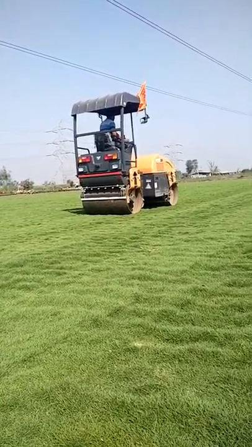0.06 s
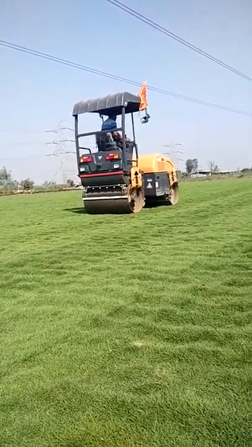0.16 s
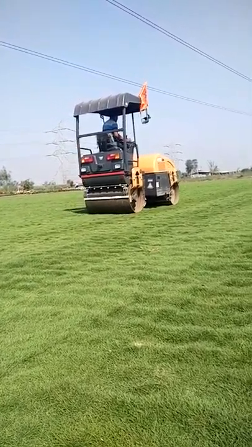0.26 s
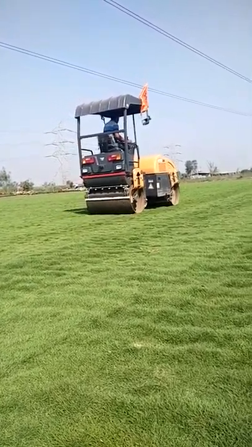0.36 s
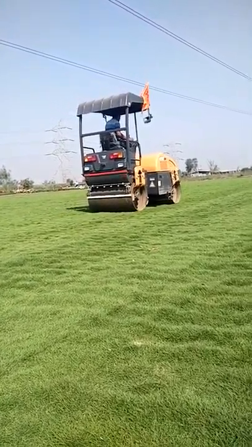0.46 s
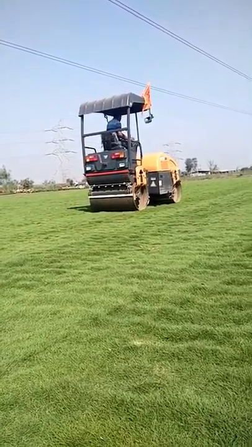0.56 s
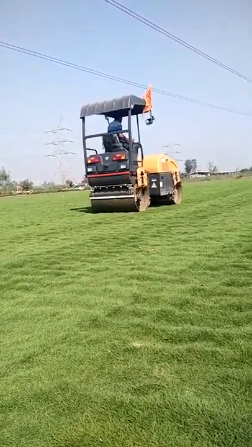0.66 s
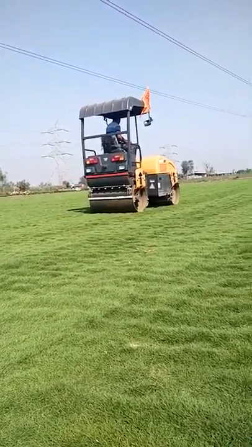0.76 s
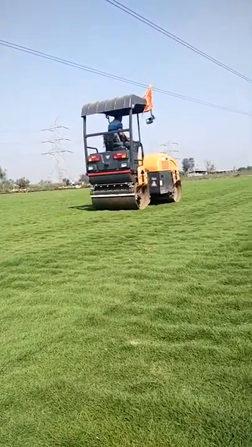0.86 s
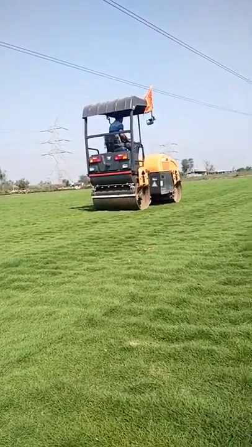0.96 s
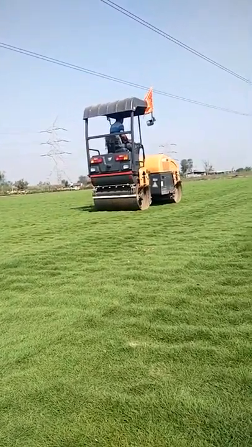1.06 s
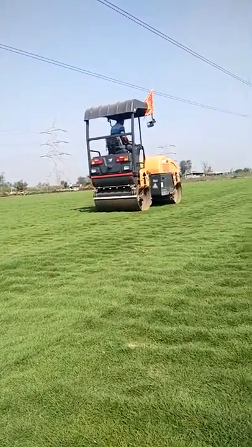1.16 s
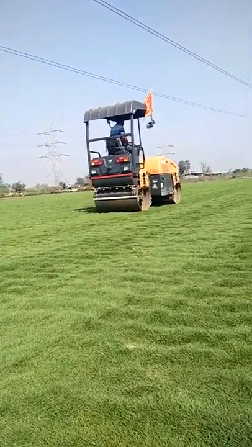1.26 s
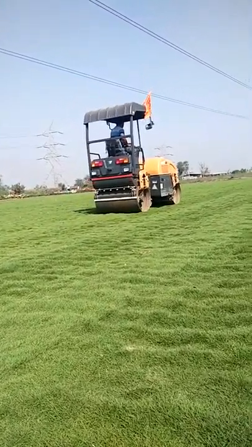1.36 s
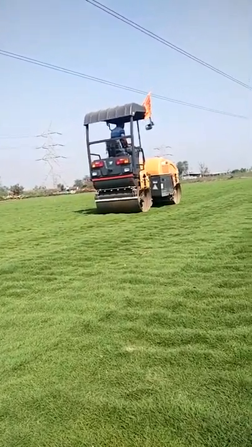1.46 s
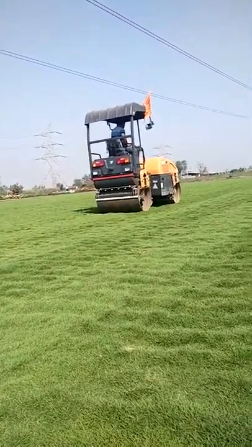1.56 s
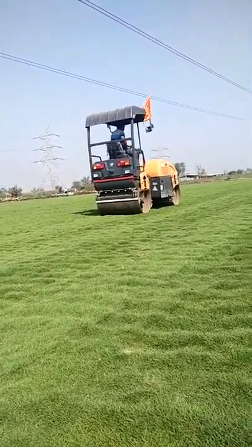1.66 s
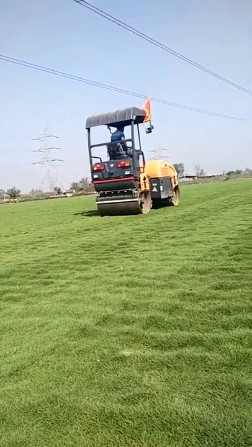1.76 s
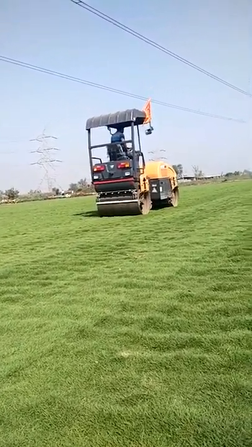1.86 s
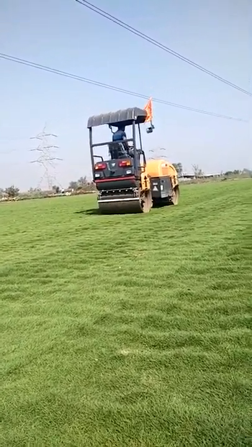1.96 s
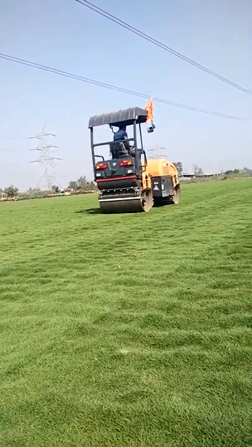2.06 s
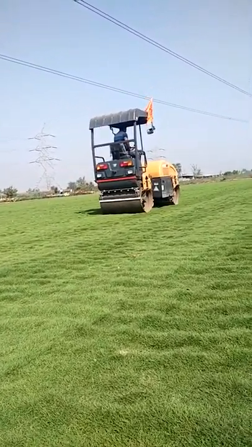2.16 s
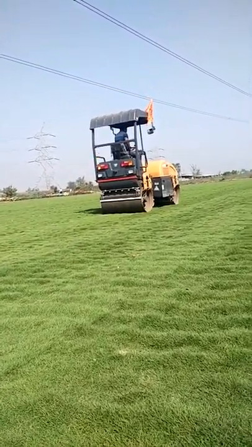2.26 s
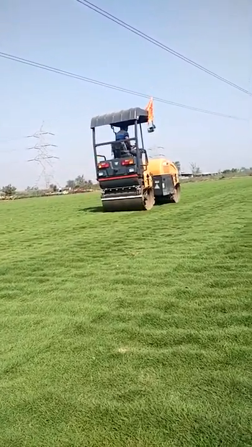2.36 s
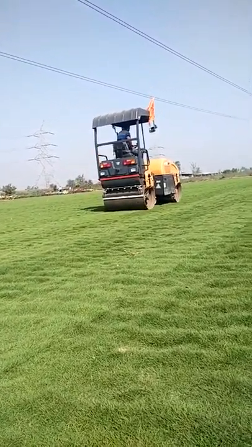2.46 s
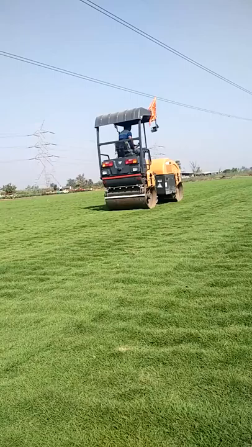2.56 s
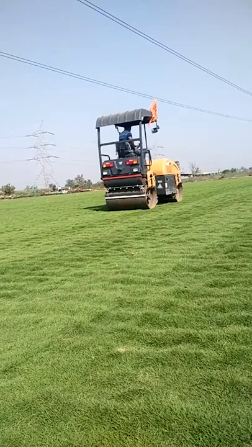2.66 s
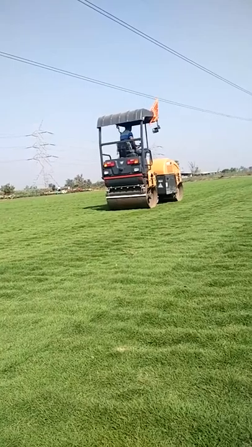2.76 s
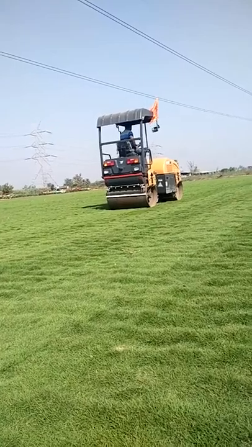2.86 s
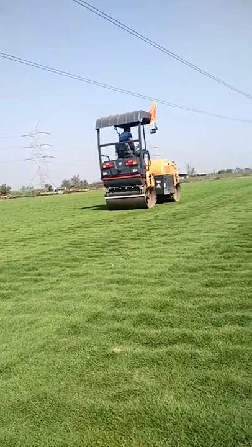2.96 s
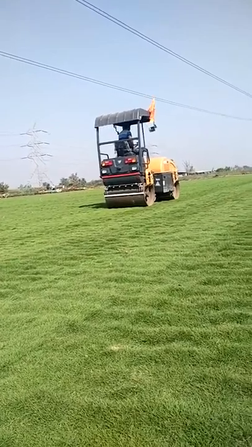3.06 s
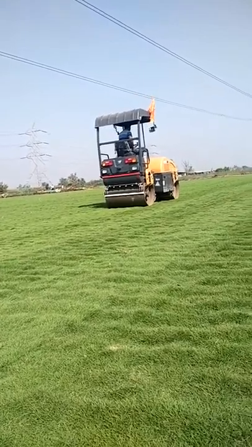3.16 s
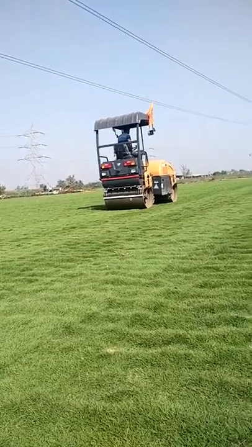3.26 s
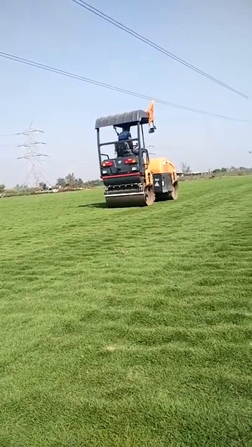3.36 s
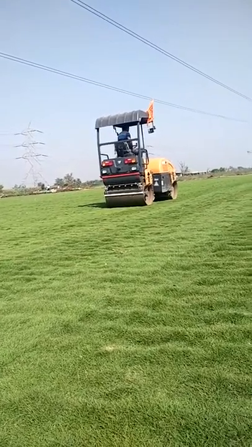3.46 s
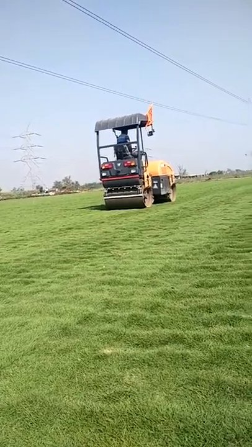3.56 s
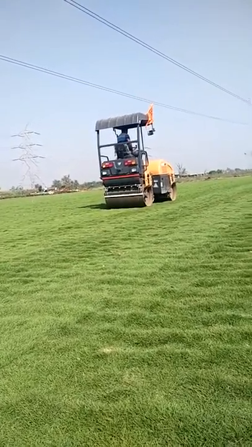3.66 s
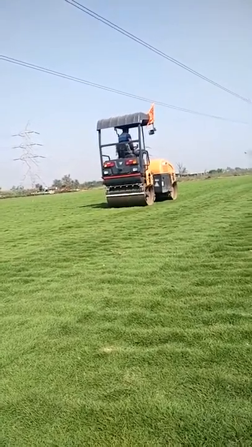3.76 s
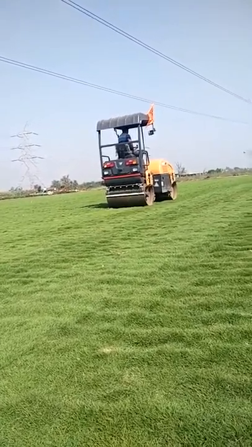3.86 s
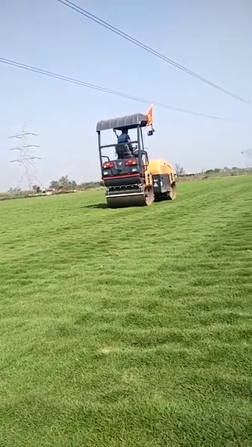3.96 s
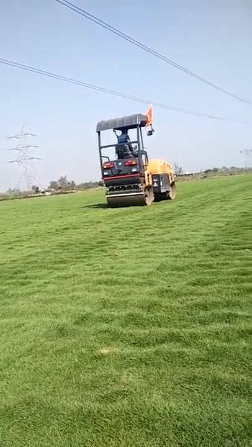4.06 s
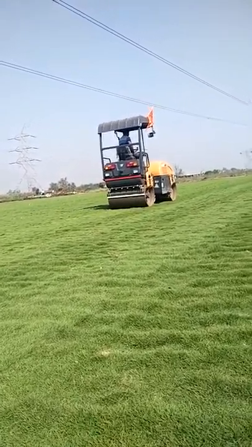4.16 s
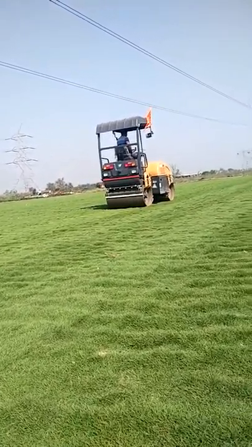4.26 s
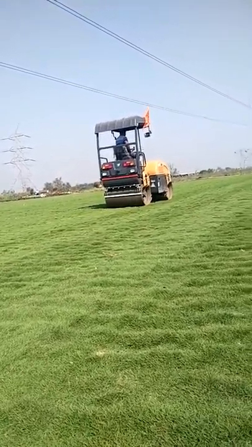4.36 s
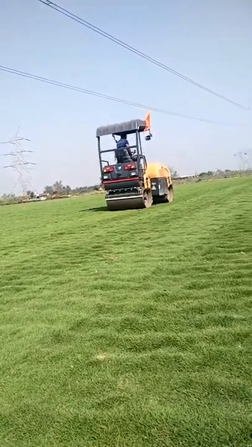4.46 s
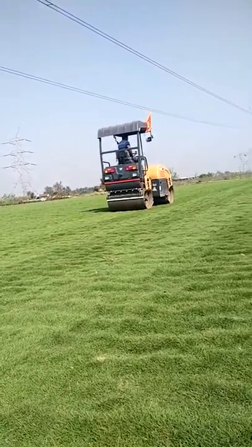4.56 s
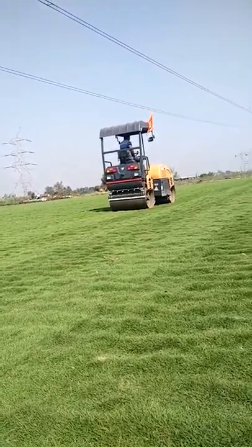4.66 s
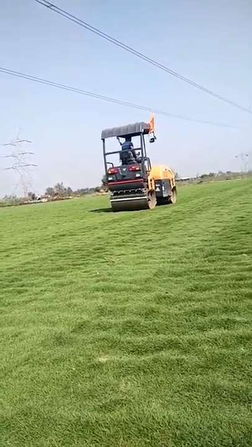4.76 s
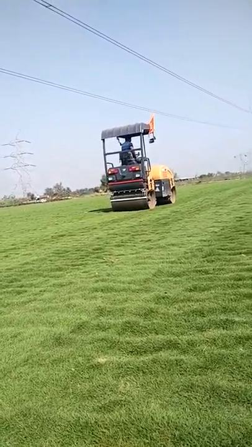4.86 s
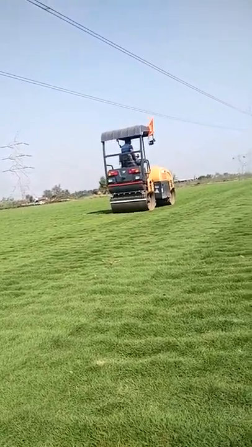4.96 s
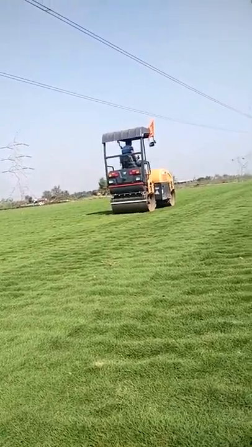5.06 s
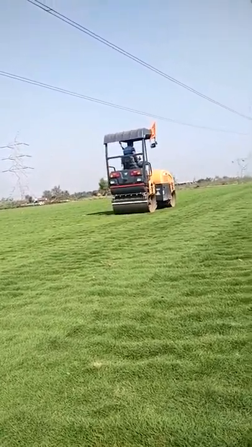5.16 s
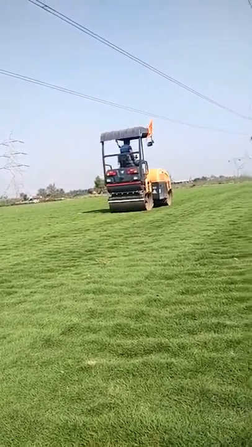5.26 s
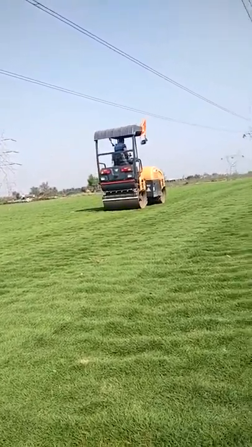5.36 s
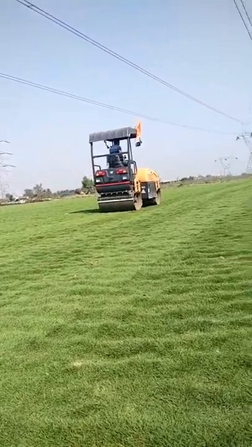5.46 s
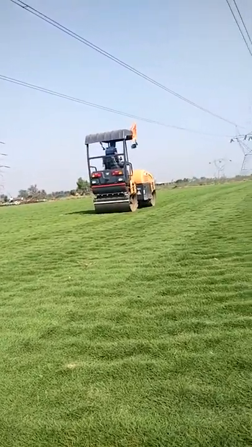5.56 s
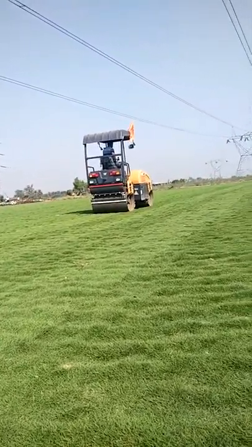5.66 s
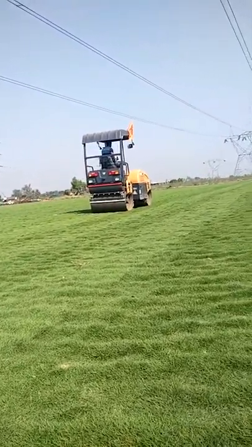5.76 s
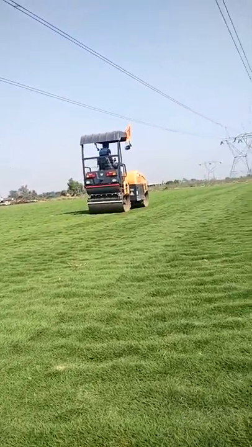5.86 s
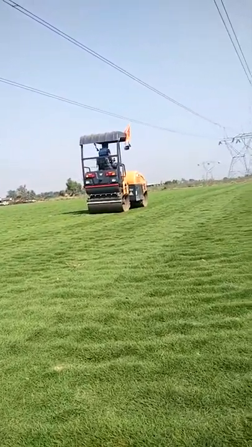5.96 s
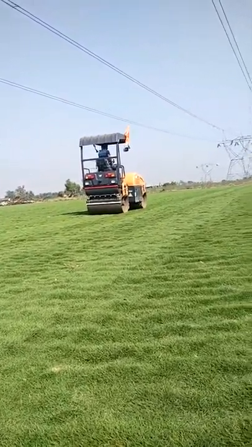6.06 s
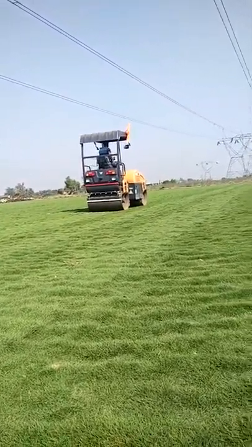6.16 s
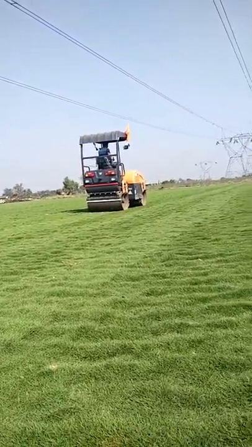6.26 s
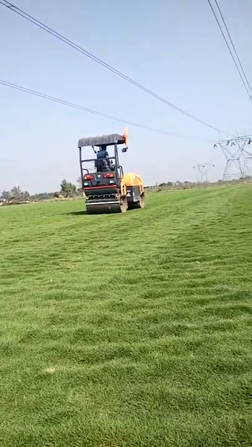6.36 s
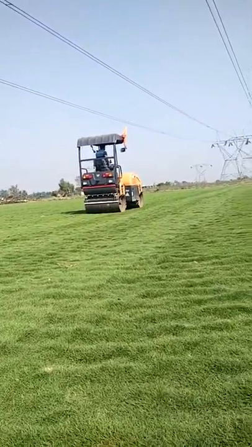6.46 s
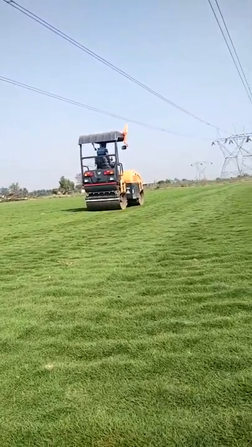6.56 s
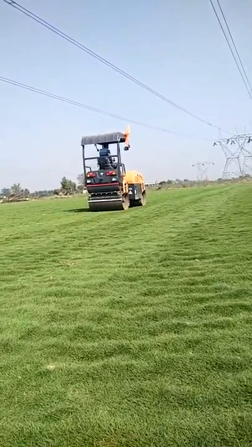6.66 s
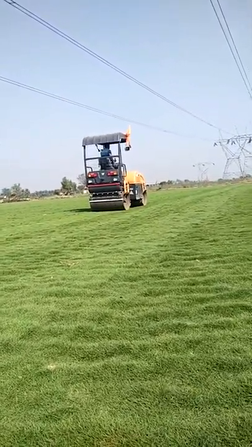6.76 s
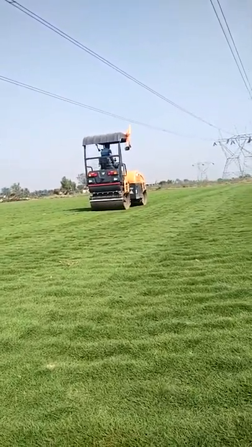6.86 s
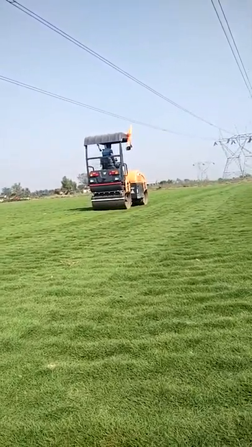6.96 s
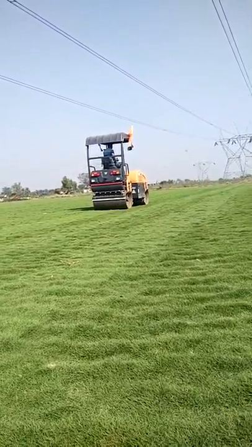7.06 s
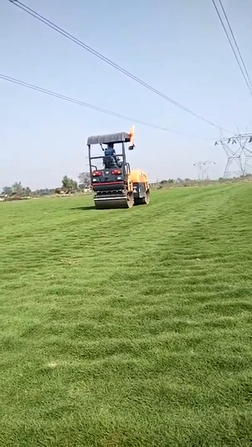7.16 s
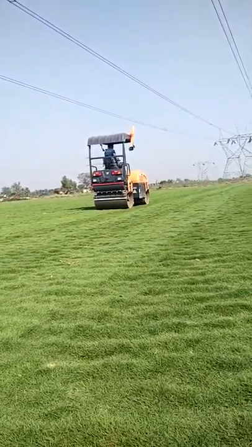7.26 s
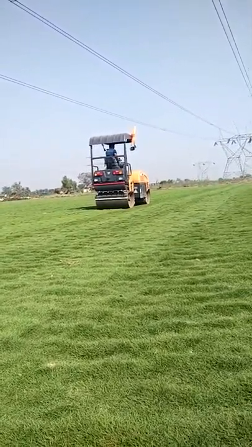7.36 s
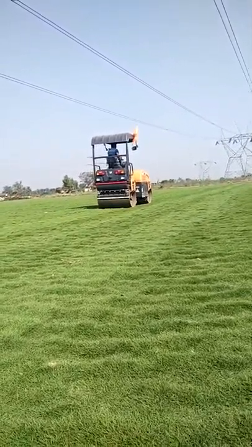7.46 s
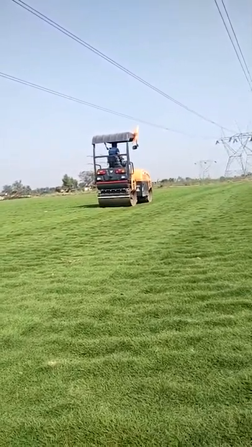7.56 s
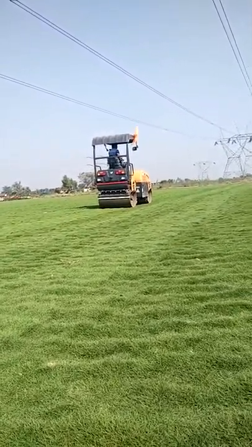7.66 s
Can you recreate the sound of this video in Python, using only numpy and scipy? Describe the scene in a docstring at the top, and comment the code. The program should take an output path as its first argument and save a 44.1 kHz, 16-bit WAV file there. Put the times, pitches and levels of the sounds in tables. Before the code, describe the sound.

A small ride-on roller runs on an open lawn with no echo. Its engine drones steadily and surges slightly about once a second, while a loose metal panel chatters and clacks sharply and a deep throb swells and sinks. After about two seconds the rattling eases, and the machine grows fainter and duller as it drives away from the microphone.

```python
"""On an open lawn, with no echo, a small ride-on roller drives away, growing fainter and duller.
Its engine drifts around 79 firings a second and works harder after each dip in speed.
Each firing puffs through the exhaust and shakes a loose metal panel, which chatters most when the
engine works hard and clacks on bumps. A deep throb, probably the vibrating drum, swells and sinks."""
import sys
import numpy as np
from scipy import signal
from scipy.fft import rfft, irfft, next_fast_len
from scipy.io import wavfile
from scipy.ndimage import uniform_filter1d, map_coordinates

SR = 44100
rng = np.random.default_rng(int(sys.argv[2]) if len(sys.argv) > 2 else 0)


def int16_out(signal):
    """Quantize to a 16-bit WAV file."""
    q = np.round(np.clip(np.atleast_2d(signal).T, -1, 1) * 32767)
    wavfile.write(sys.argv[1], SR, q.astype(np.int16))


N = 339570

# the engine's slowest and fastest moments as its speed control hunts: t/s, firing rate/Hz
ENGINE_SPEED = [(-0.1, 78.79), (0.39, 77.18), (0.91, 79.24), (1.59, 77.95), (2.16, 79.82), (2.88, 78.02),
                (3.49, 79.85), (4.12, 77.68), (4.77, 79.9), (5.3, 77.45), (6.07, 79.76), (6.66, 77.92),
                (7.37, 79.26), (7.78, 77.9)]
# the repeating strengths of four firings in a row: level/dB
FIRING_PATTERN = [-0.1, 0.39, -0.35, -0.29]
# the loose panel's low ring, then its upper tones: f/Hz, width/Hz, level/dB, delay/firings
PANEL_TONES = [(2879, 35.4, -2, 0.97), (3440, 44, -1, 0.936), (3553, 72, 0, 0.711), (4218, 98, -3.5, 0.013),
               (4362, 102, -2.5, 0.0045), (4300, 240, -37, 0.033)]
# hard knocks of the panel: t/s, peak level/dB, f/Hz of the tone struck hardest
PANEL_KNOCKS = [(0.166, -18, 3417), (0.269, -18.5, 3490), (0.3202, -23, 3520), (0.4489, -32, 4350),
                (0.5786, -20.5, 3660), (0.705, -20, 3620), (0.9337, -20.5, 2763), (1.084, -28, 3420),
                (1.2365, -19.5, 3440), (1.3392, -16, 2770), (1.4037, -21, 3420), (1.6074, -16.5, 2830),
                (1.632, -17, 2930), (1.6851, -19, 4350), (1.915, -23, 3520), (1.9652, -23.5, 2890),
                (2.0654, -31, 3380), (2.6184, -32.5, 2860), (2.7217, -30, 4500), (2.902, -29, 2870),
                (3.0797, -23.5, 3600), (3.2695, -30, 2860), (3.4467, -35.5, 2800), (3.5959, -35, 3450),
                (4.0796, -28, 3580), (5.3645, -36.5, 3490), (5.4296, -35, 4220), (5.597, -34, 4260),
                (5.699, -36, 2870), (6.5686, -40, 3460), (6.8508, -35.5, 2830)]


def amp(db):
    """Turn decibels into a gain."""
    return 10 ** (np.asarray(db) / 20)


def unit(x):
    """Scale a sound to an average (rms) size of 1."""
    return x / np.sqrt(np.mean(x ** 2) + 1e-20)


def curve(rows):
    """Join (time, value) points with straight lines, one value per sample."""
    return np.interp(np.arange(N) / SR, *np.transpose(rows))


def wobble(rate):
    """A smooth curve through `rate` random points a second."""
    return map_coordinates(rng.standard_normal(int(N * rate / SR) + 4), [np.arange(N) * rate / SR])


def softened(gain):
    """Smooth the steps in a gain so that they do not click."""
    return uniform_filter1d(gain, size=64, axis=-1)


def filtered(x, response):
    """Multiply each frequency in x by response(frequency)."""
    size = next_fast_len(N + SR // 2)
    return irfft(rfft(x, size) * response(np.fft.rfftfreq(size, 1 / SR)), size)[:N]


def shaped(x, f, db):
    """Give x a tone colour (a level for each frequency), at size 1."""
    return unit(filtered(x, lambda hz: amp(np.interp(np.log(hz + 1), np.log(f), db))))


def coloured(x, colour):
    """Blend from the near to the far tone colour as the roller leaves and turns its back."""
    # t/s, share of the far colour/0-1
    far_share = [(1.8, 0), (2.8, 0.15), (4.5, 0.61), (5.4, 0.74), (7.7, 0.99)]
    share = np.clip(curve(far_share), 0, 1)
    f, near_db, far_db = np.transpose(colour)
    return unit((1 - share) * shaped(x, f, near_db) + share * shaped(x, f, far_db))


def receding(near_db, loss):
    """One part's level in dB as the roller leaves; a bigger loss makes it fade faster."""
    # the fade with distance: t/s, level/dB
    fade = [(0.0, -1.5), (0.6, -0.93), (1.1, -2.5), (2.17, -4), (2.45, -10.5), (3.4, -9), (4.45, -10.6),
            (4.9, -13), (5.9, -12), (6.3, -14), (7.1, -13.5), (7.7, -16)]
    return near_db + loss * curve(fade)


def engine_speed(delay_s=0):
    """Firings per second, swinging smoothly between slow and fast."""
    times, rates = np.transpose(ENGINE_SPEED)
    points = np.arange(len(times))
    whole, part = np.divmod(np.interp(np.arange(N) / SR - delay_s, times, points), 1)
    return np.interp(whole + (1 - np.cos(np.pi * part)) / 2, points, rates)


def surges(half_width_s, lead_s=0):
    """The engine works harder after each dip in speed: four curves of smooth rises in dB."""
    # t/s, then the rise of: thump/dB, low panel tone/dB, upper panel tones/dB, ticking/dB
    efforts = [(0.5, 15.5, -3, 6, 12.5), (1.64, 10, 6, 13.5, 12), (2.94, 6, 9, 13, 15),
               (4.3, 8.5, 9, 12.5, 12.5), (5.53, 9.5, 6, 15.5, 17.5), (6.79, 7, 4, 7.5, 5.5)]
    t = np.arange(N) / SR + lead_s
    return sum(np.outer(rises, np.exp(-((t - s) / half_width_s) ** 2)) for s, *rises in efforts)


def exhaust(firings, thump_db, drone_db, strain=1.79):
    """The muffler lets the low tones through; uneven firings add weak tones between them."""
    # the drone: f/firing rate, level/dB against drone_db
    drone_tones = [(1.25, -15), (1.75, -20.5), (2, 0.5), (2.25, -36), (3, -17), (4, -20)]
    # the growl of hard work: f/firing rate, level/dB against the strongest thump
    growl_tones = [(5, -19.5), (9, -22)]

    def tones(table):
        return sum(amp(db + .7 * wobble(16)) * np.sin(2 * np.pi * (multiple * firings + rng.random()))
                   for multiple, db in table)

    thump = amp(thump_db) * np.sin(2 * np.pi * firings)
    # the growl grows faster than the thump, so it stands out only during hard work
    growl_db = thump_db.max() + strain * (thump_db - thump_db.max())
    growl = amp(growl_db) * tones(growl_tones)
    drone = amp(drone_db) * tones(drone_tones)
    return np.sqrt(2) * (thump + growl + drone)


def turbulence(x, depth_db):
    """Swirling air: nearby frequencies swell and sink together for a moment."""
    spectrum = signal.stft(x, nperseg=1024)[2]
    patches = uniform_filter1d(rng.standard_normal(spectrum.shape), size=3, axis=0)
    patches = uniform_filter1d(patches, size=5, axis=1)
    return signal.istft(spectrum * amp(depth_db * unit(patches)), nperseg=1024)[1][:N]


def roar(firings, roar_db):
    """The fan and engine block roar: mostly swirling air, plus a part that repeats each engine cycle."""
    # f/Hz, near level/dB, far level/dB
    roar_colour = [(25, -1, -18), (107, 3, 6.5), (220, -1.5, -2), (302, 1, -1), (410, 2.5, -5),
                   (543, -6, -10), (775, -6, -11), (921, -23, -23), (1230, -17.5, -19.5),
                   (1520, -19, -21.5), (1616, -11.5, -25.5), (1734, -30.5, -24), (2135, -11, -15.5),
                   (3390, -10, -18), (7500, -42, -56)]
    cycle = rng.standard_normal(2048)
    repeating = .35 * cycle[(firings / len(FIRING_PATTERN) % 1 * len(cycle)).astype(int)]
    pulsing = 1 + 0.055 * np.cos(2 * np.pi * (firings - .1))
    air = pulsing * (rng.standard_normal(N) + repeating)
    return amp(roar_db) * coloured(turbulence(air, depth_db=3.0), roar_colour)


def bursts(firings, lag, rise, fall, scatter_db, grit_db):
    """One gritty burst of tiny taps per firing; lag, rise and fall are counted in firings."""
    index, age = np.divmod(firings - lag % 1 + 1, 1)
    count = int(index.max()) + 1
    sizes = amp(np.resize(FIRING_PATTERN, count) + scatter_db * rng.standard_normal(count))
    shape = (1 - np.exp(-age / rise)) ** 2 * np.exp(-age / fall)
    grit = amp(grit_db * wobble(1200)) * rng.standard_normal(N)
    return unit(sizes[index.astype(int)] * shape * grit)


def rattle(firings, low_db, upper_db):
    """Each firing throws the panel with a new strength, so that it chatters, rings and scrapes."""
    # f/Hz, near level/dB, far level/dB
    scrape_colour = [(2460, -43, -20), (2777, 23, 43), (3360, -5, -5), (3530, 9.5, -16), (4630, 17.5, -22),
                     (4670, -29, -40), (7200, -34, -48)]
    low_gain, upper_gain = np.hypot(amp([low_db + 0.52 * wobble(9), upper_db]), flurries())
    index = (firings + .15).astype(int)
    throw = amp(1.5 * rng.standard_normal(index.max() + 1))[index]
    tones = []
    for hz, width, db, lag in PANEL_TONES:
        chatter = throw * bursts(firings, lag, rise=.12, fall=.066, scatter_db=1, grit_db=5)
        tones.append(amp(db) * unit(ring(chatter, hz, width)))
    upper = unit(sum(amp(2.1 * wobble(9)) * tone for tone in tones[1:]))  # these trade strength
    rubbing = throw * bursts(firings, lag=.93, rise=.14, fall=.13, scatter_db=1, grit_db=3)
    scrape = amp(-4) * coloured(rubbing, scrape_colour)
    return lift() * (low_gain * tones[0] + upper_gain * (upper + scrape))


def ring(x, hz, width):
    """Let x ring one tone of the panel, with little sound far below or above it."""
    band = lambda f: 1 / (1 + (np.abs(f - hz) / 1100) ** 6)
    return filtered(x, lambda f: band(f) * 1j * f * width / (hz * hz - f * f + 1j * f * width))


def rasp(firings, rasp_db):
    """A longer, rough burst of noise comes with each firing."""
    # f/Hz, near level/dB, far level/dB
    rasp_colour = [(1900, -56, -10), (1955, 2, 4), (2560, 8, 2), (3250, 2, 6.5), (3630, 4, 9),
                   (4500, -51, -21), (4810, 4.5, -55), (5760, -4, -2), (7240, -41.5, -36)]
    noise = bursts(firings, lag=.8, rise=.12, fall=.6, scatter_db=1.5, grit_db=2)
    return amp(rasp_db) * coloured(noise, rasp_colour)


def ticking(firings, effort_db):
    """A sharp tick and a thin spit lead each firing, louder during hard work, over a soft high hiss."""
    # three tone colours: f/Hz, near level/dB, far level/dB
    tick_colour = [(2000, -13, -32), (5070, 3, -51), (5410, -3, 13.5), (5620, 9, -1), (5940, -29, -14),
                   (5850, 2, -4), (5880, -7, 6.5), (6530, 7, 4.5), (7035, -10, -12), (6950, -11, -24),
                   (8000, -40, -43), (12000, -50, -50)]
    spit_colour = [(6400, -20, -14), (7550, 2.5, -20), (7950, -40, -11), (8380, -0.5, 3.5), (9200, 3, 2),
                   (10300, -1, -10.5), (12000, -24, 0.5), (15300, -15, -28)]
    hiss_colour = [(7050, -12, -8), (10100, -11, -2), (11040, 0, -1), (12400, -13, -1), (13100, 2, 0),
                   (14100, 1, -17), (15300, -16, -7)]
    # loudness of the spit in easy running, and of the hiss: t/s, level/dB
    spit_levels = [(0.0, -73), (1.6, -69.5), (2.7, -75.5), (3.5, -70), (4.7, -75.5), (6.0, -66.5),
                   (6.6, -70.5), (7.3, -80.5), (7.7, -73)]
    hiss_levels = [(0.0, -64), (0.3, -58.5), (0.65, -68), (0.85, -60), (1.3, -70), (2.28, -72),
                   (2.52, -59.5), (2.75, -71.5), (3.62, -63), (3.8, -68), (4.0, -62), (4.25, -63.5),
                   (4.55, -69.5), (4.97, -65), (5.55, -73), (6.25, -65), (7.0, -68.5), (7.7, -72)]
    tick_db = receding(-48, loss=1.86) + effort_db
    spit_db = curve(spit_levels) + 0.51 * effort_db
    puffs = lambda: bursts(firings, lag=.78, rise=.08, fall=.19, scatter_db=1.6, grit_db=1)
    taps = bursts(firings, lag=.818, rise=.033, fall=.25, scatter_db=1.8, grit_db=1.5)
    tick = coloured(taps, tick_colour)
    spit = coloured(puffs() + 0.34 * rng.standard_normal(N), spit_colour)
    hiss = coloured(rng.standard_normal(N) + 0.64 * puffs(), hiss_colour)
    hiss_db = curve(hiss_levels) + 0.77 * wobble(25)
    return amp(tick_db) * tick + amp(spit_db) * spit + amp(hiss_db) * hiss


def drum(middle_hz=50.2, rest_db=-52):
    """The drum shakes the ground with a deep, throbbing tone that rises after the engine slows."""
    # start/s, length/s, peak level/dB
    throbs = [(0.267, 0.41, -19.5), (0.653, 0.45, -39), (1.142, 0.33, -28), (1.396, 0.5, -22),
              (1.908, 0.34, -24.5), (2.13, 0.35, -36), (2.47, 0.48, -34.5), (2.72, 0.31, -32),
              (3.035, 0.43, -32), (3.5, 0.43, -39), (3.9, 0.22, -52), (4.137, 0.47, -29.5),
              (4.96, 0.5, -39.5), (5.303, 0.46, -33), (5.764, 0.44, -40.5), (6.32, 0.73, -37),
              (6.96, 0.43, -36), (7.2, 0.57, -44)]
    t = np.arange(N) / SR
    rate = engine_speed(delay_s=0.2)
    hz = middle_hz + 1.91 * (rate.mean() - rate)
    arch = lambda start, length: np.abs(np.sin(np.pi * np.clip((t - start) / length, 0, 1))) ** 1.23
    power = amp(rest_db) ** 2 + sum((amp(db) * arch(start, length)) ** 2 for start, length, db in throbs)
    return np.sqrt(2 * power) * np.sin(2 * np.pi * np.cumsum(hz) / SR)


def lift(depth_db=3.5, flight_s=0.02):
    """The panel lifts clear just before each clack, so the gain of its chatter dips."""
    t = np.arange(N) / SR
    landings = np.append(np.sort(np.transpose(PANEL_KNOCKS)[0]), np.inf)
    wait = landings[np.searchsorted(landings, t)] - t
    return softened(amp(-depth_db * np.exp(-(wait / flight_s) ** 2)))


def clacks(bounce_db=-7, crack_db=-5, clink_db=5, attack_s=0.0008):
    """Bumps throw the panel against its frame; it lands again, softer, one firing later."""
    out, t = np.zeros(N + SR), np.arange(SR // 10) / SR
    period = 1 / np.mean(ENGINE_SPEED, axis=0)[1]
    crack_band = signal.butter(2, [2600, 5200], "bandpass", fs=SR)
    sine = lambda hz: np.sin(2 * np.pi * (hz * t + rng.random()))
    for s, db, clink_hz in PANEL_KNOCKS:
        for start, level in [(s, db), (s + period, db + bounce_db)]:
            body = sum(amp(tone_db) * np.exp(-np.pi * width * t) * sine(hz)
                       for hz, width, tone_db, _ in PANEL_TONES)
            clink = amp(clink_db) * np.exp(-t / 0.006) * sine(clink_hz)
            noise = unit(signal.lfilter(*crack_band, rng.standard_normal(len(t))))
            crack = amp(crack_db) * np.exp(-t / 0.00035) * noise
            hit = (body + clink + crack) * (1 - np.exp(-t / attack_s))
            out[round(start * SR):][:len(t)] += amp(level) * hit / np.abs(hit).max()
    return out[:N]


def flurries(low_db=-16.5, upper_db=-18.5, decay_s=0.13):
    """Each clack leaves the panel chattering briefly: gains for its low tone and its upper tones."""
    kicks = np.zeros((2, N))
    split_hz = (PANEL_TONES[0][0] + PANEL_TONES[1][0]) / 2
    for s, db, hz in PANEL_KNOCKS:
        kicks[int(hz > split_hz), round(s * SR)] = amp(db)
    dying = signal.lfilter([1], [1, -np.exp(-1 / (decay_s * SR))], kicks)
    return amp([[low_db], [upper_db]]) * softened(dying)


def swish():
    """One brief dry scrape as the first long spell of chatter dies down."""
    # t/s, level/dB
    swish_levels = [(1.9, -114), (2.02, -48), (2.15, -49), (2.27, -50), (2.38, -94)]
    # f/Hz, level/dB
    swish_colour = [(1900, -29), (2400, 20), (3000, -8), (4100, -19), (4700, 10), (5200, 19), (5700, -40),
                    (7000, -50)]
    return amp(curve(swish_levels)) * shaped(rng.standard_normal(N), *np.transpose(swish_colour))


def scene():
    """One running count of firings keeps the engine's parts in step; bright parts fade fastest."""
    firings = np.cumsum(engine_speed()) / SR
    thump_rise = surges(half_width_s=0.22)[0]
    _, low_rise, upper_rise, tick_rise = surges(half_width_s=0.36, lead_s=0.017)
    pipe = exhaust(firings, thump_db=receding(-36, loss=0.57) + thump_rise,
                   drone_db=receding(-31.5, loss=0.79) + 0.62 * wobble(8))
    panel = rattle(firings, low_db=receding(-34.5, loss=2.05) + low_rise,
                   upper_db=receding(-38, loss=1.97) + upper_rise)
    rasping = rasp(firings, receding(-38.5, loss=1.75))
    machine = pipe + roar(firings, receding(-35, loss=1)) + drum()
    return (machine + panel + rasping + clacks() + swish() + ticking(firings, tick_rise))[None]


def record(dry, top_hz=15650):
    """Cut away the very highest treble."""
    return filtered(dry[0], lambda hz: hz < top_hz)[None]


dry = scene()
out = record(dry)
int16_out(out)
```